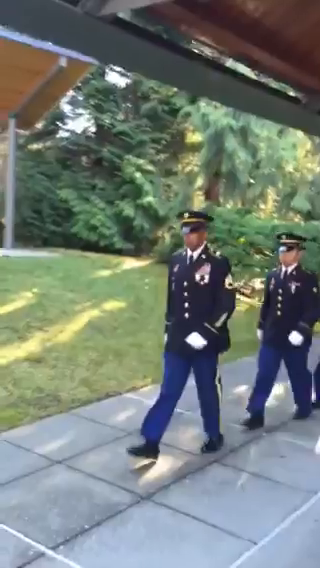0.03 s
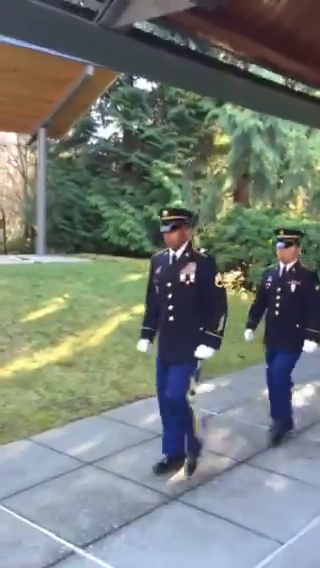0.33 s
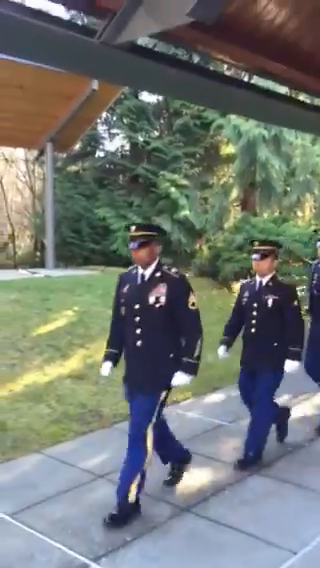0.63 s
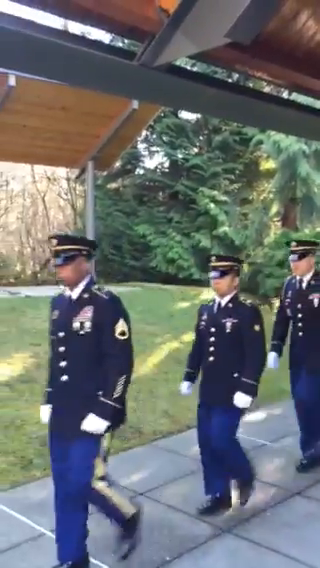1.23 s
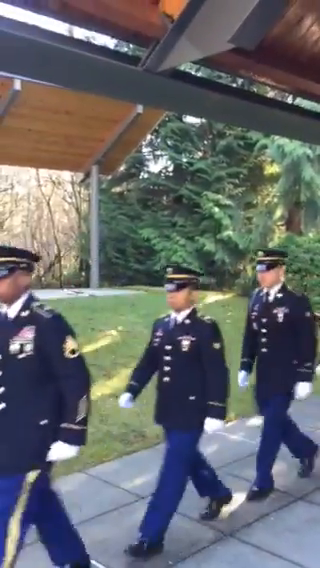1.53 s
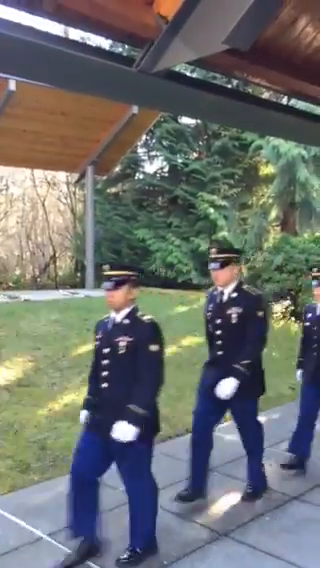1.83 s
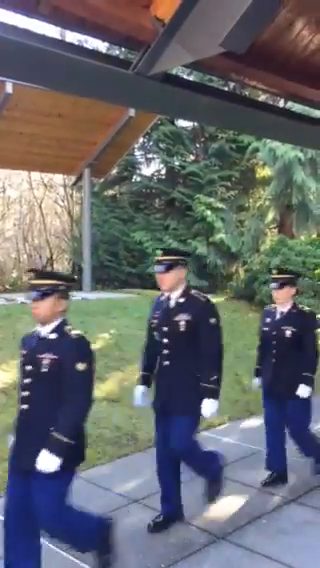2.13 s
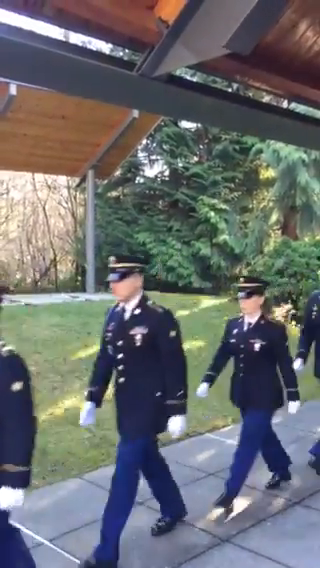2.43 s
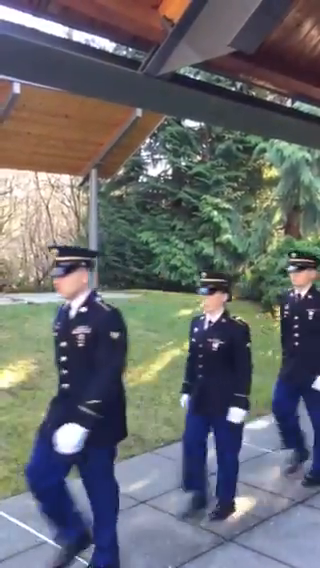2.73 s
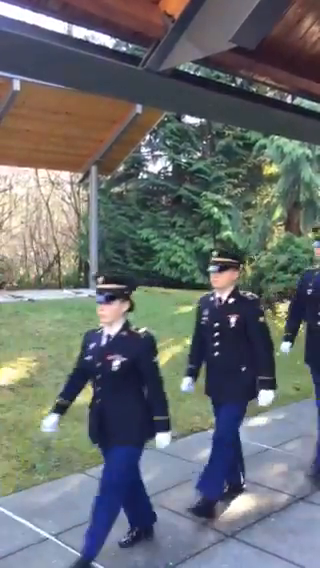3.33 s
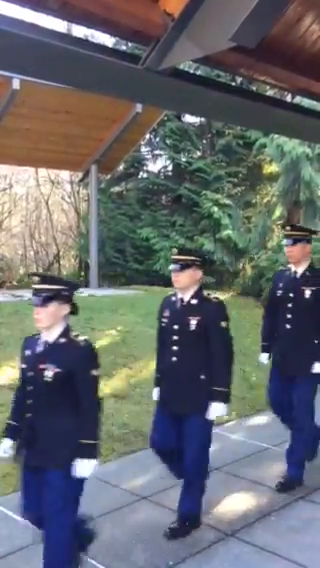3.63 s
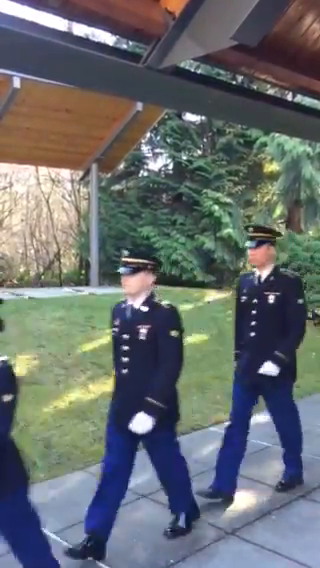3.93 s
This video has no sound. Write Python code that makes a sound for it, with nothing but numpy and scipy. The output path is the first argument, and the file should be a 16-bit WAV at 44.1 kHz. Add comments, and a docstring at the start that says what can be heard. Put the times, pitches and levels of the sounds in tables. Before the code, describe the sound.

Marching footsteps thump in step on stone paving, echoing briefly under a roof.

```python
"""Stone paving under a wooden roof: a file of people marches in step, two paces a second.
Each pace is a ragged volley of heels, each a dull thump with a short knock from its hard edge.
Soles scuff, creak, skid and crunch grit; uniforms rustle. The roof answers every step with
an echo, a low ring and a diffuse tail, over a faint outdoor rumble and hiss."""
import sys
import numpy as np
from scipy import signal
from scipy.fft import rfft, irfft, next_fast_len
from scipy.io import wavfile
from scipy.ndimage import map_coordinates

SR = 44100
rng = np.random.default_rng(int(sys.argv[2]) if len(sys.argv) > 2 else 0)


def dump(signal):
    """Clip the signal to [-1, 1] and save it as 16-bit WAV at the path in sys.argv[1]."""
    limited = np.clip(np.atleast_2d(signal).T, -1, 1)
    pcm = np.round(limited * 32767).astype(np.int16)
    wavfile.write(sys.argv[1], SR, pcm)


N = 176400

# Outdoor hiss. Each row: frequency in Hz, relative level in dB.
AIR_SPECTRUM = [(20, -14), (40, -15), (62, 0.5), (140, -12.5), (250, -12.5), (400, -20.5), (800, -21),
                (1400, -23), (2500, -26.5), (5000, -31.5), (9000, -35), (10400, -38), (12000, -37),
                (15300, -38)]
# Distant rumble. Each row: time in seconds, level in dB.
RUMBLE_LEVELS = [(0, -62), (0.349, -82), (.55, -79), (.8, -73), (1.8, -61), (2.35, -73), (2.9, -84),
                 (3.35, -62), (3.9, -66)]
# Soles brushing, dragging, creaking. Each row: start in seconds, length in seconds, level in dB.
SCUFFS = [(.080, 0.026, -52.5), (1.032, 0.016, -49), (1.616, 0.032, -58), (2.031, 0.03, -53.5),
          (2.585, 0.067, -59), (3.107, 0.021, -52)]
DRAGS = [(.89, 0.21, -61.5)]
CREAKS = [(.218, 0.044, -62), (1.211, 0.044, -57.5), (1.469, 0.019, -60), (2.156, 0.023, -57),
          (2.174, 0.018, -50.5), (3.095, .03, -60), (3.168, 0.031, -56), (3.62, 0.073, -64),
          (3.767, 0.0045, -57)]
# Friction of soles and cloth. Each row: frequency in Hz, relative level in dB.
SCUFF_SPECTRUM = [(500, 11.5), (1400, 9), (2500, -0.5), (4200, 1), (5000, -2), (7000, -1), (8000, -5),
                  (9200, 0), (10400, -6), (12000, 1), (15000, -9.5)]
DRAG_SPECTRUM = [(150, -16), (400, 11), (600, 7), (870, 3), (1200, -14.5), (4000, -44), (15000, -49)]
CREAK_SPECTRUM = [(400, -1), (1300, 2.5), (1800, -7), (2700, 4.5), (3800, -8), (6500, -15.5), (15000, -26)]
RUSTLE_SPECTRUM = [(300, -2), (900, 0.5), (2500, -2), (4000, -5.5), (5000, -9), (7000, -9.5), (8000, -21),
                   (9200, -9.5), (10400, -21), (12000, -13), (15000, -23.5)]
# Heel strikes. Each row: start in seconds, thump level in dB, thump pitch in Hz,
# knock level in dB, knock pitch in Hz.
HEELS = [(.087, -35, 195, -38, 730), (0.137, -35.5, 264, -36.5, 810), (0.162, -41, 217, -42, 860),
         (.177, -35.5, 205, -45, 676), (0.571, -50, 144, -46.5, 1910), (.597, -36.5, 167, -34.5, 870),
         (0.618, -48.5, 242, -45, 1050), (0.642, -44, 145, -54, 1210), (.661, -37.5, 216, -37.5, 800),
         (.679, -37.5, 194, -42, 890), (0.714, -42.5, 240, -59, 700), (0.741, -46.5, 245, -51, 800),
         (0.983, -38, 180, -69, 710), (1.033, -43, 136.6, -53, 1430), (1.068, -40, 145, -50, 700),
         (1.081, -32.5, 243, -36, 740), (1.101, -43.5, 212, -42, 1050), (1.138, -41, 262, -37.5, 590),
         (1.146, -37, 236, -42, 1270), (1.203, -44.5, 300, -54, 790), (1.246, -46.5, 213, -55, 940),
         (1.515, -44, 189, -79.5, 800), (1.554, -40, 166.2, -48, 1530), (1.593, -27.5, 196, -34.5, 710),
         (1.647, -33.5, 192, -41, 2500), (2.031, -43.5, 175, -46.5, 1760), (2.085, -29, 163, -35, 733),
         (2.118, -39, 205, -46, 690), (2.544, -37, 228, -36, 1630), (2.553, -33, 226, -32, 770),
         (2.582, -29.5, 171, -37, 930), (2.608, -37.5, 227, -58, 800), (2.658, -46.5, 235, -66, 800),
         (2.69, -42.5, 214, -61, 800), (2.637, -46, 203, -35.5, 1180), (3.016, -36.5, 167, -42, 1870),
         (3.043, -33, 284, -34, 710), (3.053, -29.5, 148, -37.5, 1100), (3.058, -34.5, 160, -39, 1400),
         (3.090, -46, 190, -45, 880), (3.107, -35.5, 220, -35.5, 1250), (3.131, -39.5, 161, -49, 810),
         (3.525, -29.5, 190, -34, 1560), (3.536, -37.5, 220, -34, 1670), (3.542, -42.5, 142, -40, 775),
         (3.551, -30, 287, -33, 850), (3.58, -38, 192, -43.5, 900), (3.628, -38.5, 212, -36.5, 920),
         (3.678, -52, 183, -49, 1250), (3.744, -45.5, 183, -75, 810), (3.793, -47, 210, -81, 806)]
# A heel's thump at THUMP_REF_HZ, and its edge's crack. Each row: frequency in Hz, relative level in dB.
THUMP_SPECTRUM = [(30, -43), (65, -7.5), (110, 0), (200, 4.5), (300, 0.5), (450, -21), (800, -21),
                  (1500, -57), (4000, -55)]
CRACK_SPECTRUM = [(150, 2), (500, 16), (850, 7), (1200, -5.5), (2400, -3.5), (3500, -19.5), (8000, -23.5),
                  (15000, -38)]
# Soft bumps between paces. Each row: start in seconds, level in dB, pitch in Hz.
BUMPS = [(0.314, -55, 105), (0.388, -55.5, 95), (0.453, -54, 196), (2.234, -52, 215), (2.28, -59, 130.7),
         (3.173, -42, 190), (3.984, -57.5, 145)]
# Stride rustles. Each row: start in seconds, time to peak in seconds, level in dB.
RUSTLES = [(.09, 0.063, -73.5), (.59, 0.18, -72.5), (1.06, 0.12, -69), (1.58, 0.17, -70.5),
           (2.081, 0.088, -67), (2.54, 0.19, -68), (3.029, 0.1, -66), (3.52, 0.13, -65.5)]
# Middle of each volley, in seconds.
PACES_S = [0.128, 0.642, 1.11, 1.609, 2.098, 2.59, 3.078, 3.569]
# Roof tail decay. Each row: frequency in Hz, T60 in seconds.
ROOF_DECAY = [(60, 0.22), (200, 0.52), (600, 0.23), (2000, 0.19), (6000, 0.19), (15000, 0.067)]
# Roof reverb colour. Each row: frequency in Hz, gain in dB.
ROOF_TONE = [(40, -0.5), (90, -16), (220, -6.5), (450, -3), (1000, -5.5), (3000, -8), (12000, -11.5)]
# Heel skids. Each row: start in seconds, level in dB, initial pitch in Hz, T60 in seconds.
SKIDS = [(0.617, -42, 1380, 0.023), (1.55, -47.5, 1720, .055), (1.645, -53, 2570, .03),
         (2.552, -42, 1620, .03), (2.636, -52, 1300, .03), (3.147, -52, 2560, .13), (3.55, -44, 1260, .03),
         (3.667, -47, 2080, 0.042)]
# Ticks of grit and, last, one tiny squeak. Each row: start in seconds, peak in dB, band centre in Hz.
TICKS_AND_SQUEAK = [(.694, -52.5, 5930), (1.034, -40.5, 8950), (1.151, -50.5, 8000), (1.592, -49, 4420),
                    (1.662, -54.5, 5000), (1.744, -55, 5900), (2.605, -50, 3530), (3.108, -41, 7000),
                    (3.185, -49.5, 2140), (3.640, -48.5, 4200), (3.768, -49, 2790), (3.783, -41, 17000)]

THUMP_REF_HZ = 200


def amp(db):
    """Decibels to gain."""
    return 10 ** (np.asarray(db) / 20)


def unit(x):
    """Scale to rms 1."""
    return x / np.sqrt(np.mean(x ** 2) + 1e-20)


def along(points, hz):
    """Interpolate (Hz, value) points on a log frequency axis."""
    f, values = np.transpose(points)
    return np.interp(np.log(hz + 1), np.log(f + 1), values)


def filtered(x, response):
    """Apply a frequency response."""
    size = next_fast_len(len(x) + 8192)
    return irfft(rfft(x, size) * response(np.fft.rfftfreq(size, 1 / SR)), size)[:len(x)]


def noise(spectrum, n=N):
    """Coloured noise, rms 1."""
    return unit(filtered(rng.standard_normal(n), lambda hz: amp(along(spectrum, hz))))


def band_noise(hz, log_width, n):
    """Noise band around hz, rms 1."""
    band = lambda f: 1 / (1 + (np.log((f + 1) / hz) / log_width) ** 2)
    return unit(filtered(rng.standard_normal(n), band))


def wobble(knots_per_s):
    """Smooth random curve."""
    return map_coordinates(rng.standard_normal(N // 8), [np.arange(N) * knots_per_s / SR + 2])


def add(track, start_s, sound):
    """Mix a sound in."""
    i = int(np.clip(round(start_s * SR), 0, N - 1))
    track[i:i + len(sound)] += sound[:N - i]


def outdoors(air_db=-63.5, rumble_hz=67, width_hz=22.2, waver_db=1.5):
    """Faint steady air and a wavering distant rumble."""
    band = lambda hz: 1 / (1 + ((hz - rumble_hz) / width_hz) ** 4)
    rumble = unit(filtered(rng.standard_normal(N), band))
    rumble_db = np.interp(np.arange(N) / SR, *np.transpose(RUMBLE_LEVELS)) + waver_db * wobble(2.3)
    return amp(air_db) * noise(AIR_SPECTRUM) + amp(rumble_db) * rumble


def rub(strokes, spectrum, grain, rise_share):
    """Friction noise, chopped by its grain, in strokes that swell and fade."""
    t, level = np.arange(N) / SR, np.zeros(N)
    for start_s, length_s, db in strokes:
        progress = np.maximum(t - start_s, 0) / length_s
        level += amp(db) * (1 - np.exp(-progress / rise_share)) * np.exp(-2 * progress ** 2)
    return level * unit(noise(spectrum) * grain)


def soles(slips_per_s=200, jitter=0.12, fade_cycles=0.25, rub_floor=0.27, grain_db=1.5):
    """Soles scuff and drag on stone; a shoe rolling off creaks by stick-slip."""
    cycle = np.cumsum(slips_per_s * np.exp(jitter * wobble(slips_per_s))) / SR % 1
    slips = rub_floor + np.exp(-cycle / fade_cycles)
    grain = amp(grain_db * wobble(900))
    scuffs = rub(SCUFFS, SCUFF_SPECTRUM, grain, rise_share=0.049)
    drags = rub(DRAGS, DRAG_SPECTRUM, grain, rise_share=0.12)
    creaks = rub(CREAKS, CREAK_SPECTRUM, slips, rise_share=0.14)
    return scuffs + drags + creaks


def thump(hz):
    """A dull push of about two cycles, sinking in pitch as it settles."""
    scaled_hz = np.fft.rfftfreq(SR // 5, 1 / SR) * THUMP_REF_HZ / hz + 1
    phase = -2 * np.pi * np.log(scaled_hz / THUMP_REF_HZ)  # each frequency lags one of its own cycles
    wave = irfft(amp(along(THUMP_SPECTRUM, scaled_hz)) * np.exp(1j * phase))[:SR // 20]
    return wave / np.abs(wave).max()


def heel(thump_db, thump_hz, knock_db, knock_hz):
    """One heel: a thump led by the knock and crack of its hard edge."""
    ring_db, ring_peak_s = -9.5, 0.00071
    crack_db, crack_t60_s, crack_rise_s = -7, 0.039, 0.001
    t = np.arange(SR // 20) / SR
    age = t / ring_peak_s
    ring = amp(ring_db) * age * np.exp(1 - age) * np.sin(2 * np.pi * knock_hz * t)
    crack = noise(CRACK_SPECTRUM, len(t))
    crack *= amp(crack_db - 60 * t / crack_t60_s) * (1 - np.exp(-t / crack_rise_s))
    return amp(thump_db) * thump(thump_hz) + amp(knock_db) * (ring + crack)


def near_steps():
    """Heels passing close by, with soft bumps between paces."""
    out = np.zeros(N)
    for start_s, *strike in HEELS:
        add(out, start_s, heel(*strike))
    for start_s, db, hz in BUMPS:
        add(out, start_s, amp(db) * thump(hz))
    return out


def rustle(grain_db=3):
    """Uniforms and soles rustle each stride: quick swell, slow fade."""
    t, level = np.arange(N) / SR, np.zeros(N)
    for start_s, peak_s, db in RUSTLES:
        age = np.maximum(t - start_s, 0) / peak_s
        level += amp(db) * age * np.exp(1 - age)
    return level * unit(noise(RUSTLE_SPECTRUM) * amp(grain_db * wobble(600)))


def far_steps(marchers=6, base_db=-49, lag_s=0.04, scatter_s=0.045):
    """The rest of the file lands weakly, scattered around each pace."""
    out = np.zeros(N)
    for pace_s in PACES_S:
        for late, force, pitch, edge in rng.uniform(-1.6, 2.0, (marchers, 4)):
            db = base_db + 2 * force
            strike = heel(thump_db=db, thump_hz=225 * np.exp(0.22 * pitch),
                          knock_db=db - 7, knock_hz=1100 * np.exp(0.476 * edge))
            add(out, pace_s + lag_s + scatter_s * late, strike)
    return out


def roof_reverb(feet, delay_s=0.012, early_db=4, early_t60_s=0.11):
    """Strong early reflections and a diffuse tail, redrawn each pace as the marchers move."""
    out = np.zeros(N)
    edges = [0] + [int((a + b) / 2 * SR) for a, b in zip(PACES_S, PACES_S[1:])] + [N]
    for start, end in zip(edges, edges[1:]):
        hz, t, bins = signal.stft(rng.standard_normal(SR * 3 // 4), SR, nperseg=256)
        fade = amp(-60 * t / along(ROOF_DECAY, hz)[:, None]) + amp(early_db - 60 * t / early_t60_s)
        band_energy = np.sum(fade ** 2, axis=1, keepdims=True) * t[1] * SR
        fade *= amp(along(ROOF_TONE, hz))[:, None] / np.sqrt(band_energy)
        response = signal.istft(bins * fade, SR, nperseg=256)[1]
        add(out, start / SR + delay_s, signal.fftconvolve(feet[start:end], response))
    return out


def roof_slap(feet, delay_s=0.021, slap_db=-20, cutoff_hz=1470):
    """One dull echo off the boards, and the low ring it sets off under the roof."""
    ring_hz, ring_db, ring_t60_s = 209.4, -7, 0.24
    width_hz = np.log(1000) / np.pi / ring_t60_s
    ring = lambda f: 1j * f * width_hz / (ring_hz ** 2 - f * f + 1j * f * width_hz)
    boards = lambda f: 1 / (1 + 1j * f / cutoff_hz)
    out = np.zeros(N)
    add(out, delay_s, filtered(feet, lambda f: amp(slap_db) * boards(f) + amp(ring_db) * ring(f)))
    return out


def skids(rise_share=0.06, pitch_sag=0.27):
    """Rubber rasps on stone at landing; pitch falls as the heel slows."""
    out, t = np.zeros(N), np.arange(SR // 8) / SR
    for start_s, db, hz, t60_s in SKIDS:
        age = t / t60_s
        band = band_noise(hz, log_width=0.22, n=len(t))
        speed = 1 - pitch_sag * np.tanh(2 * age)
        rasp = map_coordinates(band, [np.cumsum(speed)], mode="mirror")
        add(out, start_s, rasp * amp(db - 60 * age) * (1 - np.exp(-age / rise_share)))
    return out


def ticks_and_squeak(t60_s=0.012, rise_s=0.000056):
    """Sharp ticks of grit underfoot, and one tiny, very high squeak near the end."""
    out, t = np.zeros(N), np.arange(SR // 40) / SR
    for start_s, db, hz in TICKS_AND_SQUEAK:
        burst = band_noise(hz, log_width=0.23, n=len(t))
        burst *= amp(-60 * t / t60_s) * (1 - np.exp(-t / rise_s))
        add(out, start_s, amp(db) * burst / np.abs(burst).max())
    return out


def scene():
    """Marchers, roof and open air, in mono."""
    feet = near_steps() + far_steps() + skids() + ticks_and_squeak() + rustle() + soles()
    return (feet + roof_slap(feet) + roof_reverb(feet) + outdoors())[None]


def record(dry):
    """The microphone sheds deep bass and everything above its band limit."""
    low_hz, top_hz = 40, 15350
    thin = signal.sosfilt(signal.butter(2, low_hz, "high", fs=SR, output="sos"), dry[0])
    return filtered(thin, lambda hz: hz < top_hz)[None]


dry = scene()
out = record(dry)
dump(out)
```